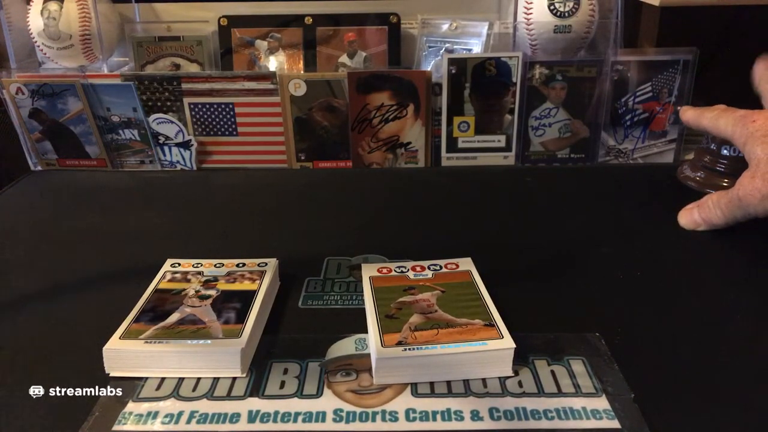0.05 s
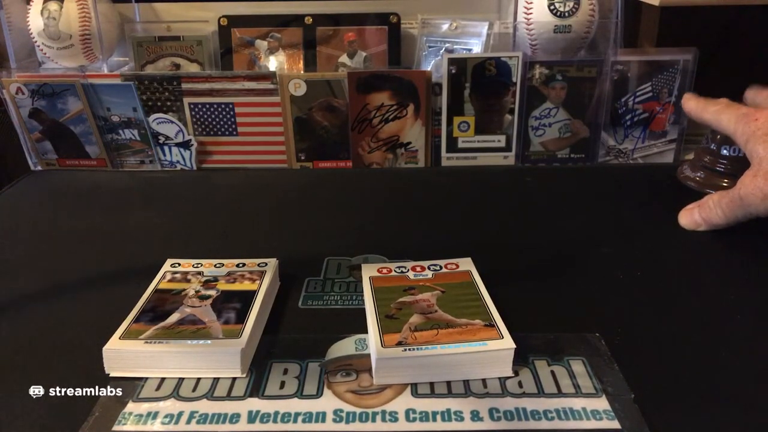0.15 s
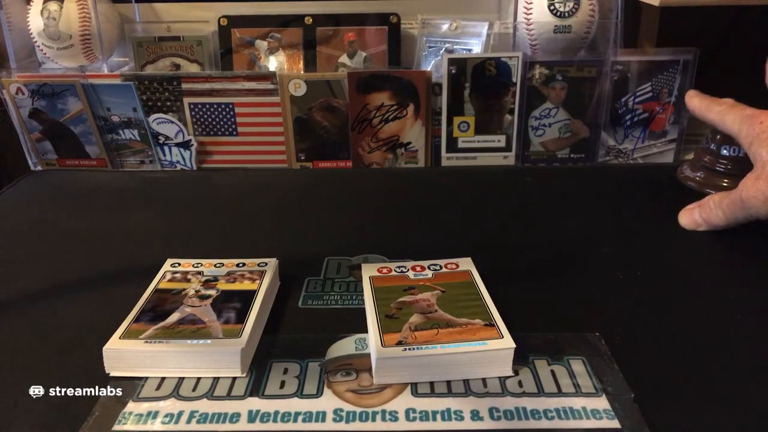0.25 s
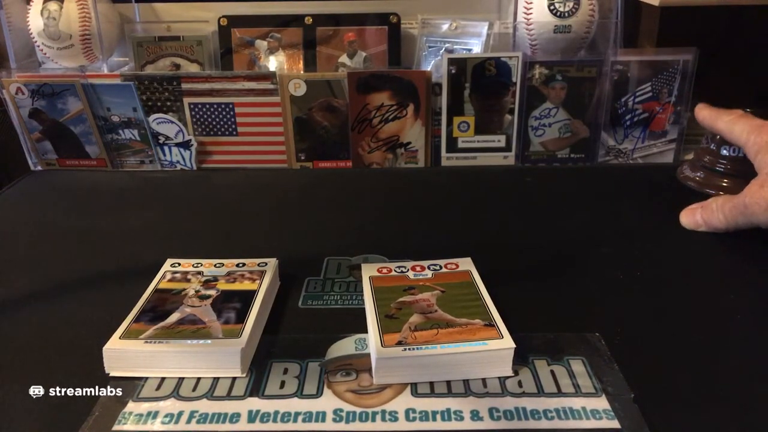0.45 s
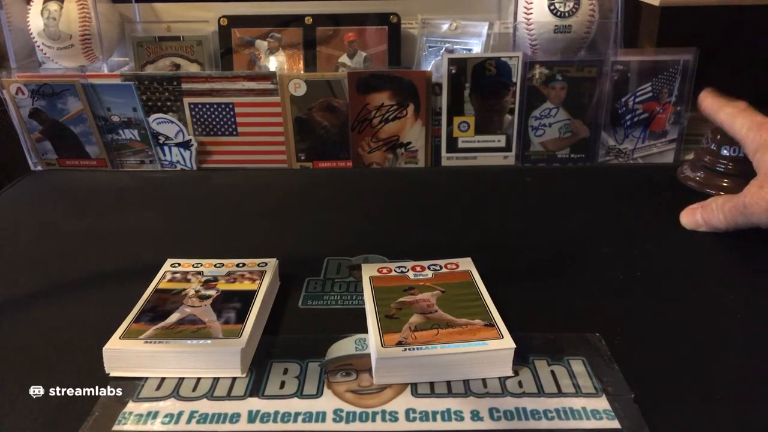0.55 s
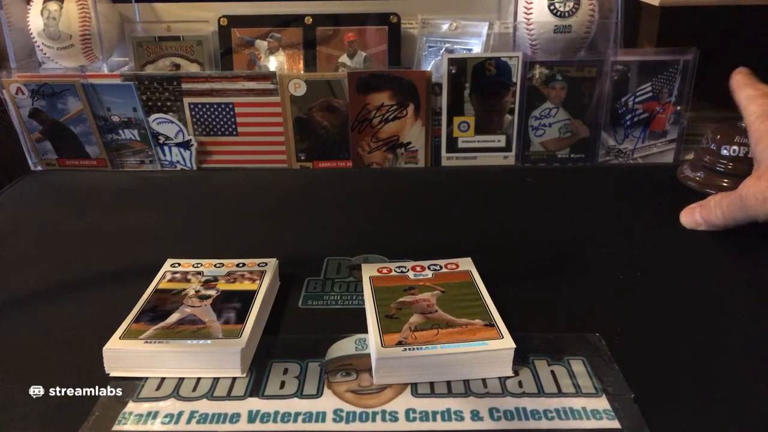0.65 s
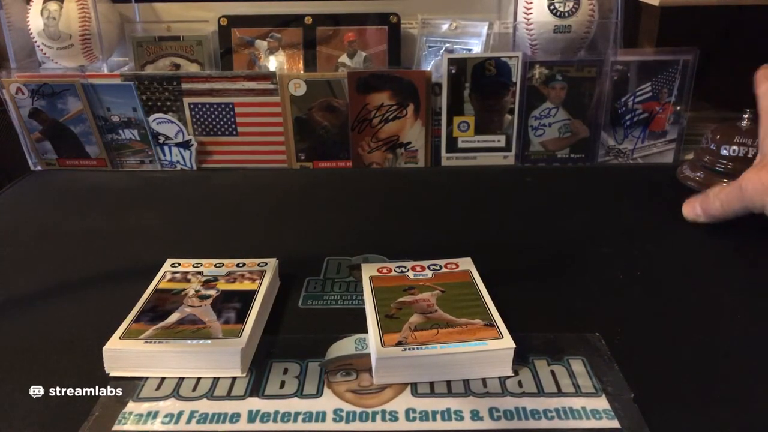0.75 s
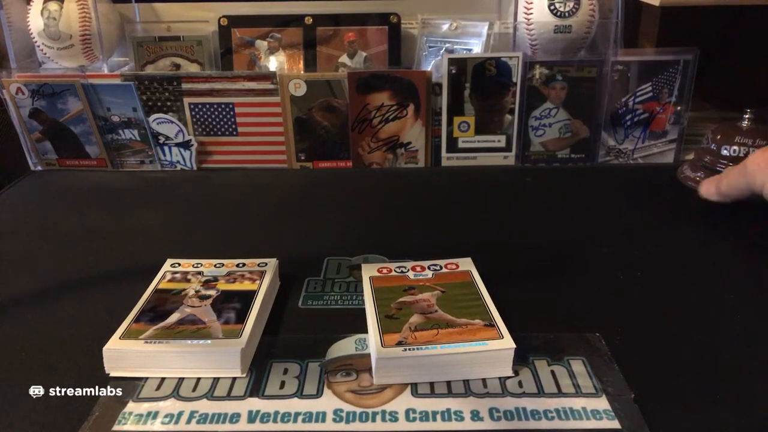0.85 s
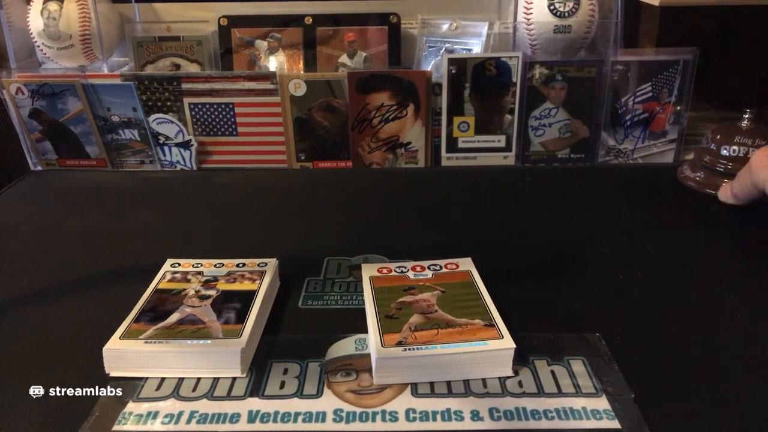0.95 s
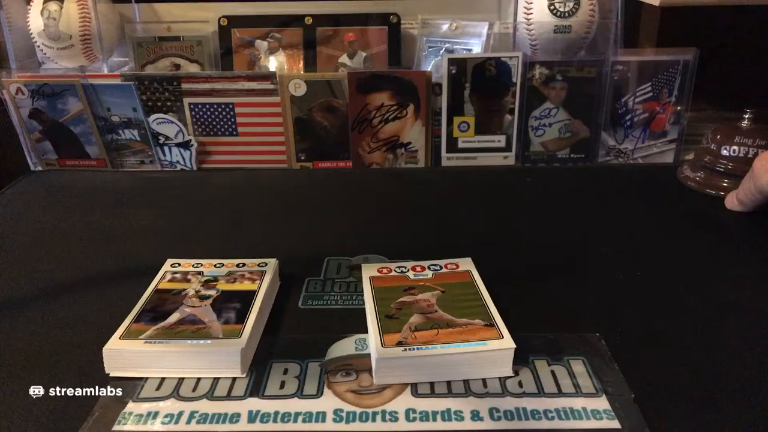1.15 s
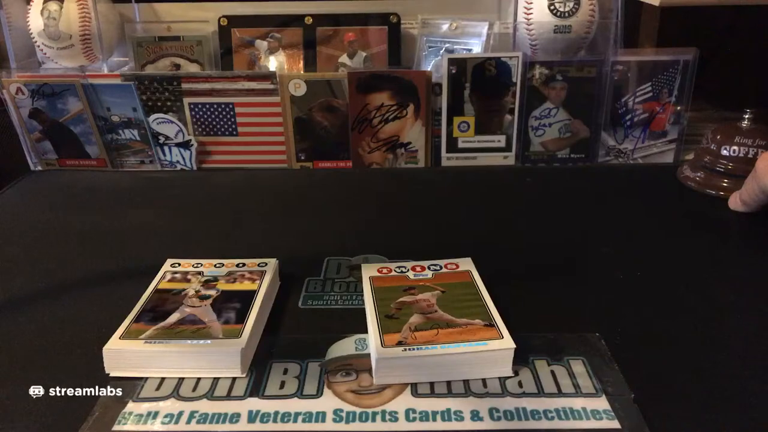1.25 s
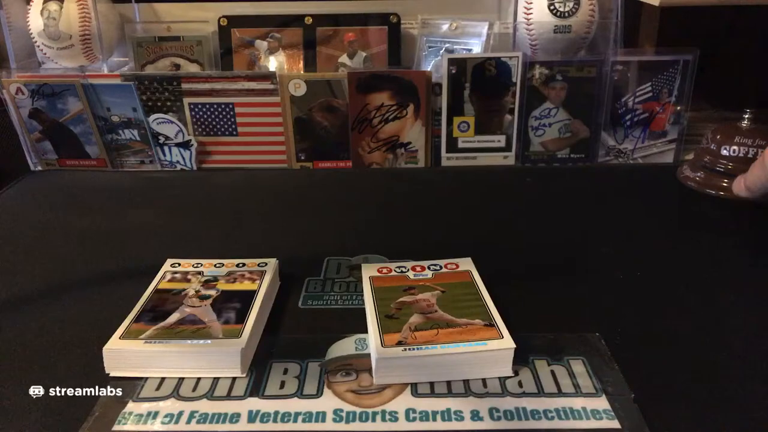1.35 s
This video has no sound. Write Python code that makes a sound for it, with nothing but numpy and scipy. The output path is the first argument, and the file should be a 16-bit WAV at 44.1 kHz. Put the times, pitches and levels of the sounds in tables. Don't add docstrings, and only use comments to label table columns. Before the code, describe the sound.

One sharp ding of a metal counter bell, with slight plunger rattle and a long wavering ring.

```python
import sys
import numpy as np
from scipy import signal
from scipy.fft import rfft, irfft
from scipy.io import wavfile
from scipy.ndimage import uniform_filter1d

SR = 44100
rng = np.random.default_rng(int(sys.argv[2]) if len(sys.argv) > 2 else 0)


def wav_out(sig):
    wavfile.write(sys.argv[1], SR, np.round(np.clip(np.atleast_2d(sig).T, -1, 1) * 32767).astype(np.int16))


def ratio_of_db(decibels):
    return 10 ** (np.asarray(decibels, float) / 20)


N = 61739
T = np.arange(N) / SR
TAP_S, STRIKE_S = 0.2178, 0.2328


def evened(x):
    return x / np.sqrt(np.mean(x ** 2) + 1e-20)


def noise(colour):
    point_hz, point_db = np.transpose(colour)
    hz = np.fft.rfftfreq(N, 1 / SR)
    gain = ratio_of_db(np.interp(np.log(hz + 1), np.log(point_hz), point_db))
    return evened(irfft(rfft(rng.standard_normal(N)) * gain, N))


def dying(start, db, t60, rise=0.00045):
    t = np.maximum(T - start, 0)
    return np.minimum(t / rise, 1) * ratio_of_db(db - 60 * t / t60)


def ring(start, pairs):
    dome_hz = [1196.1, 3262.1, 6113.4, 8339., 9551.4, 13338.6]
    rise_s, twin_ring_share = 0.00597, 0.9
    out = np.zeros(N)
    for hz, (beat_hz, db, twin_db, t60, lull_s) in zip(dome_hz, pairs):
        phase = 2 * np.pi * hz * (T - start)
        twin_phase = phase + 2 * np.pi * beat_hz * (T - lull_s)
        out += dying(start, db, t60, rise_s) * np.sin(phase)
        out -= dying(start, db + twin_db, t60 * twin_ring_share, rise_s) * np.sin(twin_phase)
    return out


def dome():
    # beat rate in Hz, level in dB, twin relative to it in dB, t60 in seconds, first lull in seconds.
    fresh_pairs = [
        (-0.7, -24, -30, 5.7, 1.7),
        (2, -22, -4.5, 3.31, 0.54),
        (7, -15.5, -4, 1.405, 0.2583),
        (37.5, -22, -3.5, 0.29, .26),
        (-11.5, -18, -4, 0.53, .291),
        (-19, -7.5, -2, .28, 0.2637),
    ]
    return ring(STRIKE_S, fresh_pairs)


def linger():
    # beat rate in Hz, level in dB, twin relative to it in dB, t60 in seconds, first lull in seconds.
    old_pairs = [
        (.3, -35.5, -23, 8.7, 0.83),
        (1.7, -36.5, -7.5, 16, -0.054),
        (7.1, -50.5, -3, 2.2, .105),
    ]
    mute_s = 0.012
    return ring(-0.01, old_pairs) * np.clip((STRIKE_S - T) / mute_s + 1, 0, 1)


def knock(start, modes):
    rise_cycles = 3
    out = np.zeros(N)
    for hz, db, t60 in modes:
        out += dying(start, db, t60, rise_cycles / hz) * np.sin(2 * np.pi * hz * (T - start))
    return out


def blow():
    # pitch in Hz, level in dB, t60 in seconds.
    frame_modes = [(335.6, -29, 0.084), (560, -30.5, .05), (1306, -26, 0.039), (2689, -33, .14),
                   (4255, -35.5, .16), (4430, -58.5, 1.7), (6020, -29.5, .1), (6183, -8.5, .03),
                   (6450, -29.5, .1), (7615, -38, 0.21), (9130, -22.5, .14), (9365, -26.5, .15),
                   (13340, -15, .02), (8345, -15.5, .08)]
    # pitch in Hz, level in dB, t60 in seconds.
    knob_modes = [(1750, -28, 0.0146), (4524, -27, .03), (6520, -32, .02), (7675, -35.5, .025),
                  (10750, -34, 0.023), (13850, -42.5, .02)]
    # frequency in Hz, level in dB per Hz.
    crack_colour = [(100, -7.5), (400, -6.5), (1000, -13.5), (2000, -4), (4500, -2), (7000, -7.5),
                    (10000, -1.5), (15500, -11.5)]
    thud_s, thud_hz = 0.221, 110
    crack = dying(STRIKE_S, -19, 0.024)
    rattle = dying(STRIKE_S, -28, 0.14)
    tap = dying(TAP_S, -31.5, 0.05)
    contact = noise(crack_colour) * (crack + rattle + tap)
    thud = dying(thud_s, -35, 0.056, rise=0.0018) * np.sin(2 * np.pi * thud_hz * (T - thud_s))
    return contact + thud + knock(TAP_S, knob_modes) + knock(STRIKE_S, frame_modes)


def ticks():
    tick_s = [.3457, .354, .356, .357, .635, .645, .6515, .654, .706, .7976, .799, .845]
    # level in dB, pitch in Hz, t60 in seconds.
    tick_tones = [(-48, 1530, 0.0625), (-44, 6300, 0.079), (-51, 3000, .05), (-52, 11000, .08),
                  (-46.5, 1900, .018), (-51, 550, 0.07), (-44, 1910, .025), (-63.5, 13000, .01),
                  (-69.5, 13500, .01), (-45.5, 1900, 0.012), (-56, 4700, .03), (-63, 11000, .03)]
    skirt_db = -28.5
    out = np.zeros(N)
    for start, (db, hz, t60) in zip(tick_s, tick_tones):
        colour = [(hz / 6, skirt_db), (hz * 0.75, 0), (hz * 1.1, 0), (hz * 1.9, skirt_db)]
        out += dying(start, db, t60) * noise(colour)
    return out


def buzz():
    # time in seconds, level in dB.
    scrape = [
        (.3, -57),
        (.335, -50.5),
        (.358, -42.5),
        (0.409, -59),
        (.455, -70),
        (.487, -57),
        (.575, -58),
        (.65, -68.5),
        (.69, -85.5),
    ]
    # pitch in Hz, width in Hz, level in dB.
    resonances = [(1600, 480, -7), (2400, 350, -9.5), (4220, 250, 0.5), (4500, 120, 0.5), (5017, 250, -1.5),
                  (6600, 370, -8), (7650, 60, -13), (8370, 100, -4.5), (8750, 160, -11), (10700, 340, -14),
                  (11500, 150, -17.5), (12350, 120, -7)]
    grain_db = 2
    s, db = np.transpose(scrape)
    grain = evened(uniform_filter1d(rng.standard_normal(N), size=300))
    level_db = np.interp(T, s, db, left=-120) + grain_db * grain
    drive = ratio_of_db(level_db) * rng.standard_normal(N)
    f = np.fft.rfftfreq(N, 1 / SR)
    response = sum(ratio_of_db(peak_db) / (1 + 2j * (f - hz) / width) ** 2 for hz, width, peak_db in resonances)
    response = response / np.sqrt(np.mean(abs(response) ** 2))
    return irfft(rfft(drive) * response, N)


def brush():
    # time in seconds, level in dB.
    motion = [
        (.6, -72),
        (.72, -66.5),
        (.82, -57),
        (.95, -57.5),
        (1.15, -62.5),
        (1.4, -64.5),
    ]
    # frequency in Hz, level in dB per Hz.
    cloth_colour = [(100, 3.5), (400, -1.5), (1100, -13), (1800, 1), (2100, -10.5), (2900, -1), (3600, -23),
                    (8000, -39.5)]
    grain_db = 1.7
    s, db = np.transpose(motion)
    grain = evened(uniform_filter1d(rng.standard_normal(N), size=500))
    return ratio_of_db(np.interp(T, s, db) + grain_db * grain) * noise(cloth_colour)


def room(x):
    t60, gap_s, fade_in_s, level_db = 0.22, 0.0032, 0.0016, -5
    slots = np.arange(0, SR // 2, 20)
    taps = np.zeros(SR // 2 + 20)
    taps[slots + rng.integers(0, 20, len(slots))] = rng.choice([-1., 1.], len(slots))
    t = np.arange(len(taps)) / SR
    taps *= ratio_of_db(-60 * t / t60) * np.clip((t - gap_s) / fade_in_s, 0, 1)
    return ratio_of_db(level_db) * signal.fftconvolve(x, taps / np.linalg.norm(taps))[:N]


def background():
    # frequency in Hz, level in dB per Hz.
    air_colour = [(20, -4.5), (90, -8), (250, -17), (700, -27.5), (2000, -37.5), (4500, -35.5),
                  (7000, -43.5), (12000, -39.5)]
    # hum pitch in Hz, level in dB rms.
    hum_tones = [
        (30.4, -58),
        (59.9, -59),
    ]
    air_db, wander_db = -59, 1.5
    out = ratio_of_db(air_db) * noise(air_colour)
    for hz, db in hum_tones:
        drift = uniform_filter1d(rng.standard_normal(N), size=4000)
        drift = evened(uniform_filter1d(drift, size=4000))
        tone = np.sin(2 * np.pi * (hz * T + rng.random()))
        out += np.sqrt(2) * ratio_of_db(db + wander_db * drift) * tone
    return out


def scene():
    bell = dome()
    mechanism = blow() + ticks() + buzz()
    dome_send_db = -16
    echoes = room(mechanism + ratio_of_db(dome_send_db) * bell)
    return (bell + mechanism + echoes + linger() + brush() + background())[None]


def top_cut(x):
    return signal.sosfilt(signal.butter(12, 16520, fs=SR, output="sos"), x)


def record(dry):
    duck_from_db, duck_share, duck_most_db = -23, 0.34, 2.5
    back_db_per_s, lag_s, edge_hz = 41, 0.026, 15900
    keep = np.exp(-1 / (lag_s * SR))
    power = signal.lfilter([1 - keep], [1, -keep], dry[0] ** 2)
    power_db = 10 * np.log10(power + 1e-12)
    fall = T * back_db_per_s
    over_db = np.maximum.accumulate(power_db + fall) - fall - duck_from_db
    duck_db = np.clip(duck_share * over_db, 0, duck_most_db)
    ducked = dry * ratio_of_db(-signal.lfilter([1 - keep], [1, -keep], duck_db))
    low_pass = signal.firwin(255, edge_hz, window=("kaiser", 9), fs=SR)
    mix = signal.oaconvolve(ducked, low_pass[None], "same")
    return top_cut(mix)


dry = scene()
out = record(dry)
wav_out(out)
```